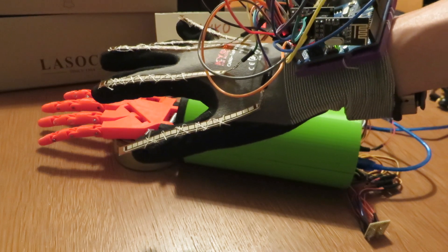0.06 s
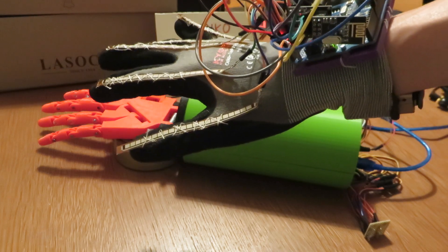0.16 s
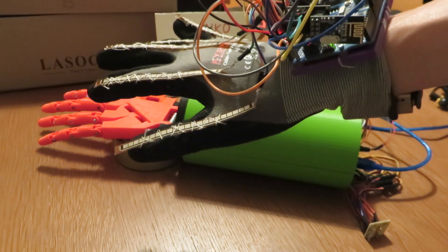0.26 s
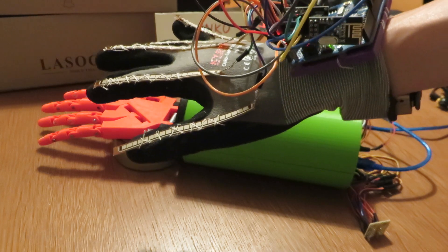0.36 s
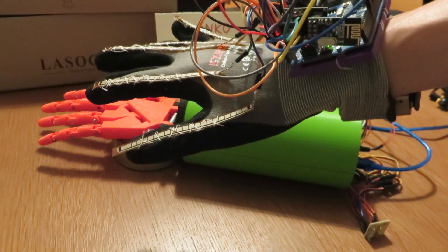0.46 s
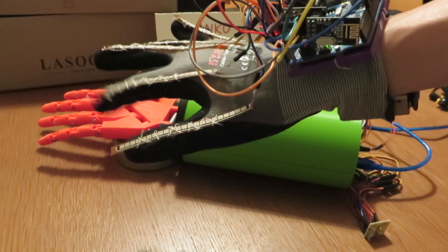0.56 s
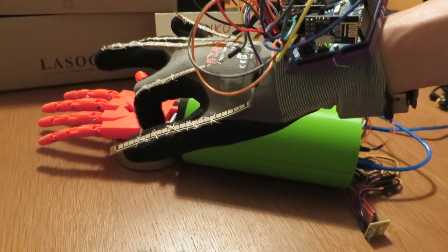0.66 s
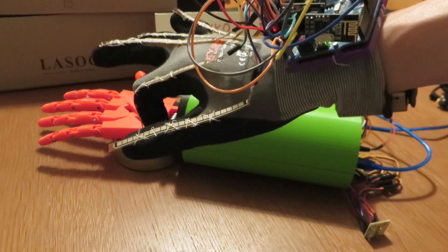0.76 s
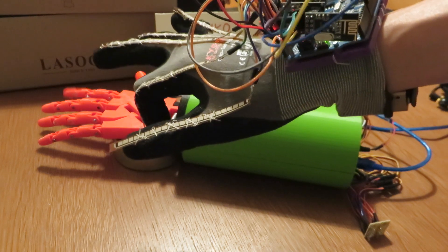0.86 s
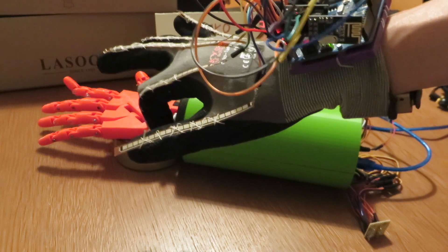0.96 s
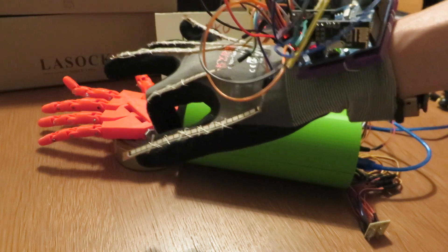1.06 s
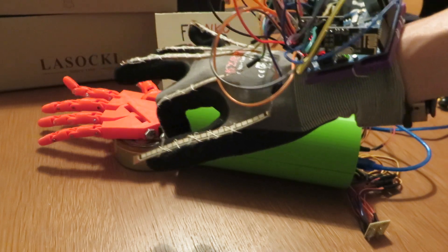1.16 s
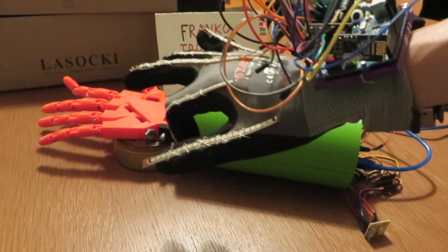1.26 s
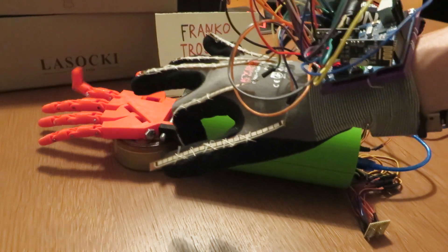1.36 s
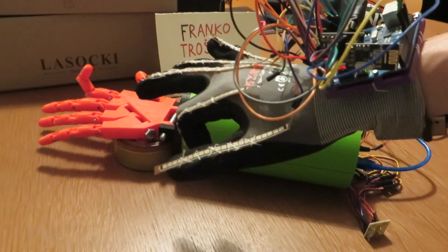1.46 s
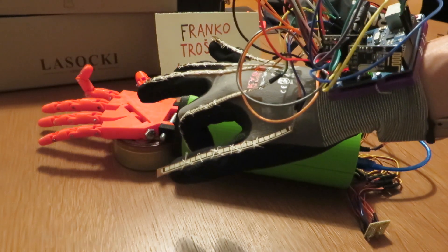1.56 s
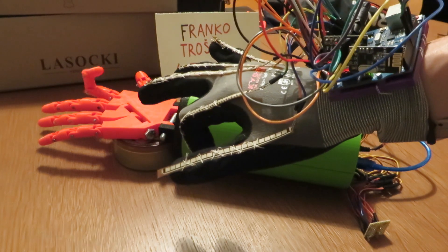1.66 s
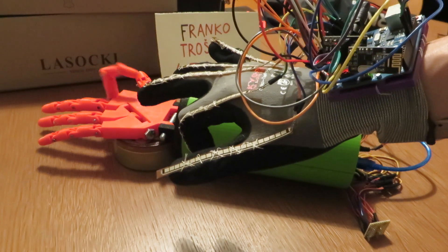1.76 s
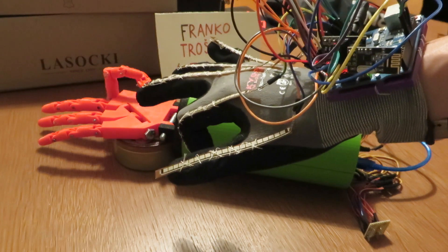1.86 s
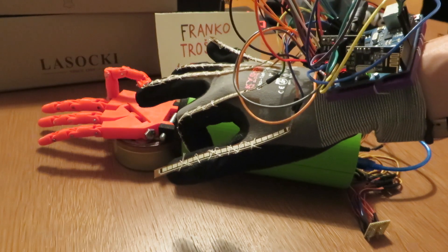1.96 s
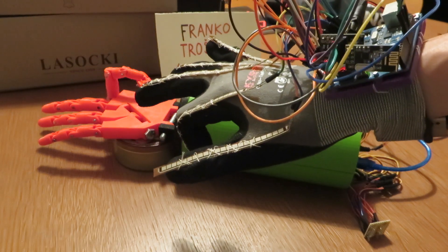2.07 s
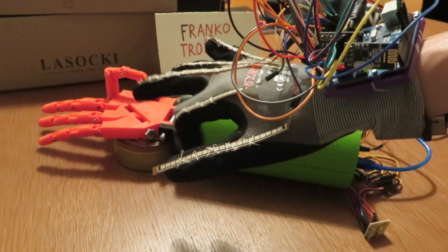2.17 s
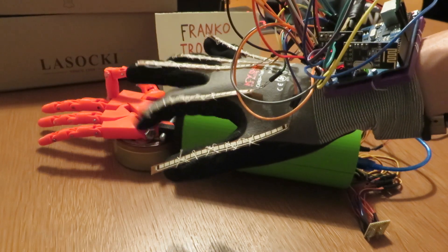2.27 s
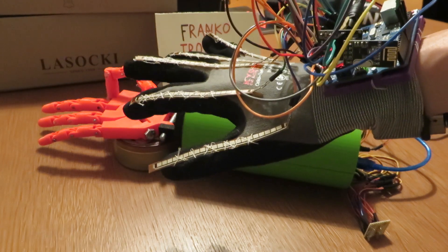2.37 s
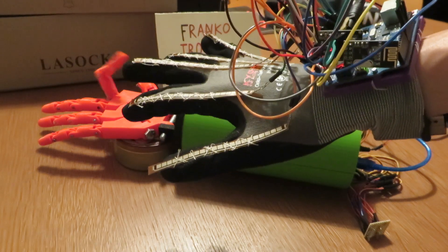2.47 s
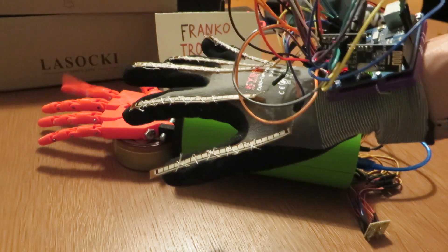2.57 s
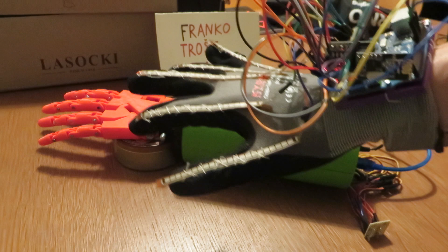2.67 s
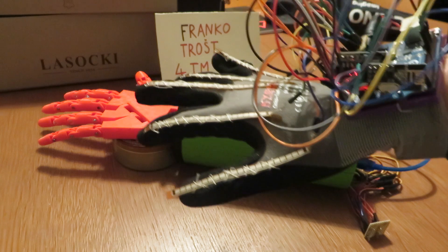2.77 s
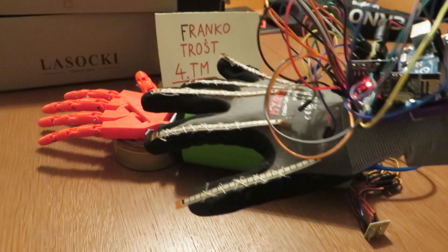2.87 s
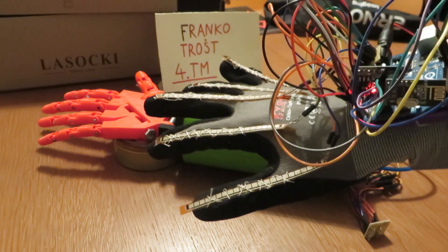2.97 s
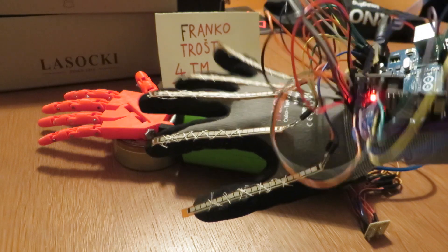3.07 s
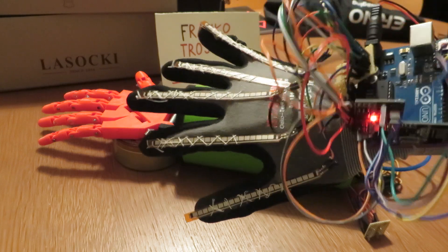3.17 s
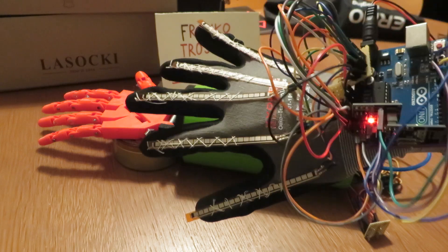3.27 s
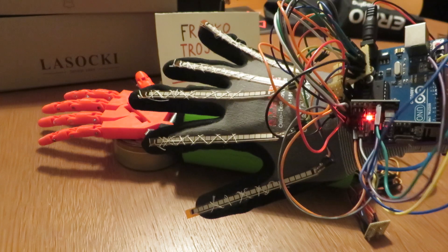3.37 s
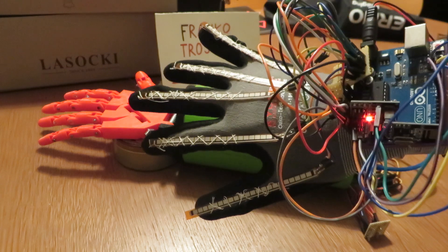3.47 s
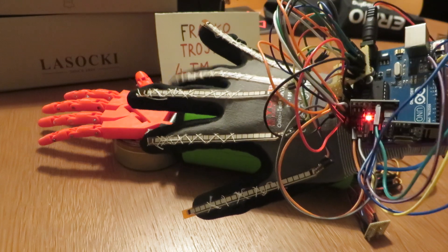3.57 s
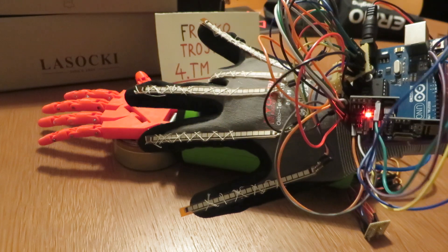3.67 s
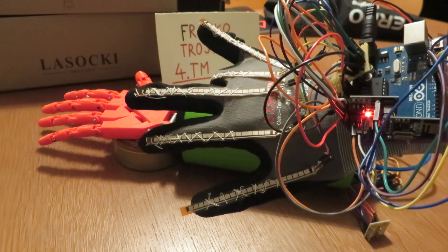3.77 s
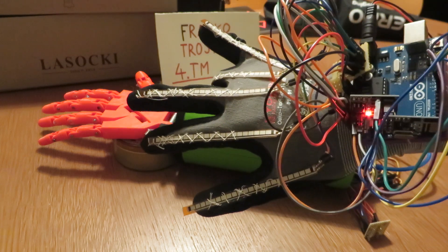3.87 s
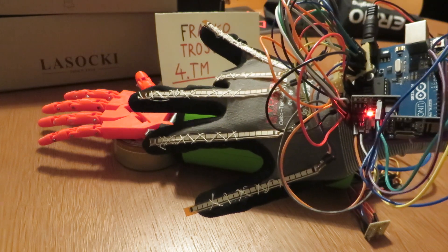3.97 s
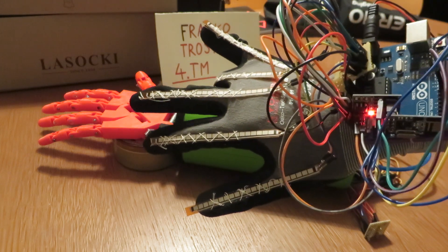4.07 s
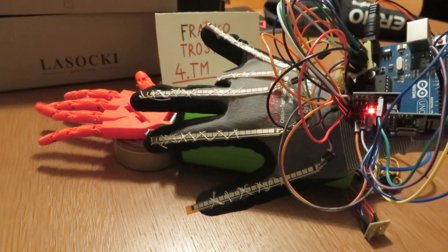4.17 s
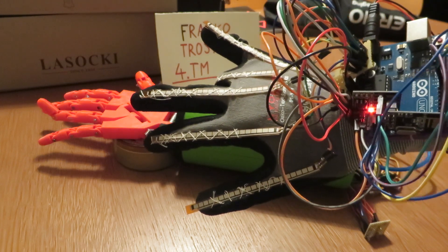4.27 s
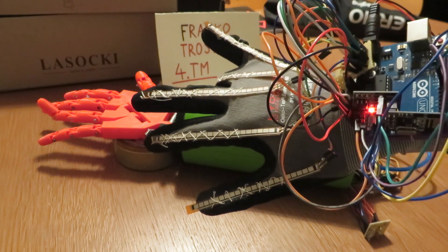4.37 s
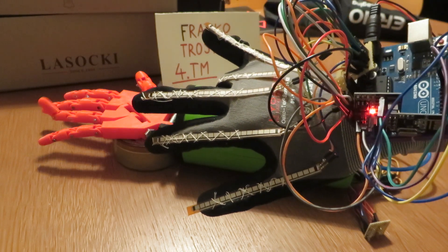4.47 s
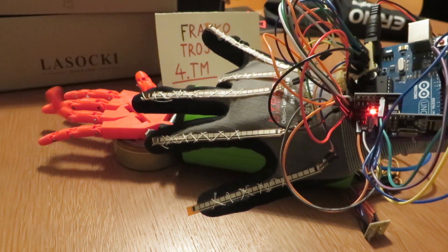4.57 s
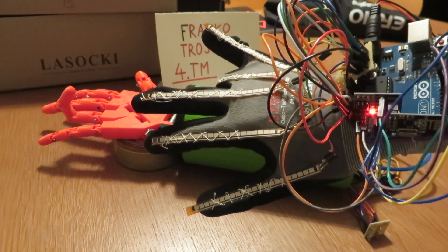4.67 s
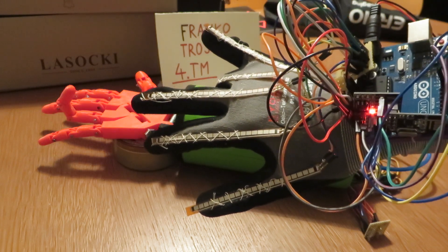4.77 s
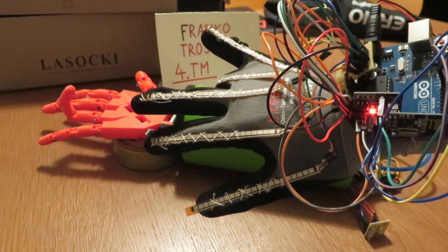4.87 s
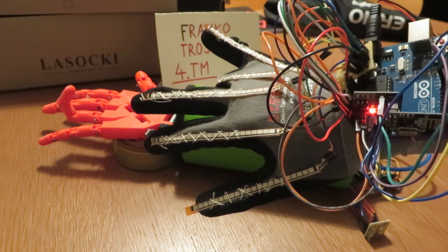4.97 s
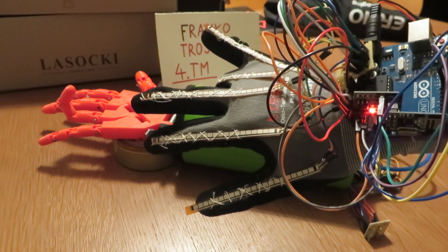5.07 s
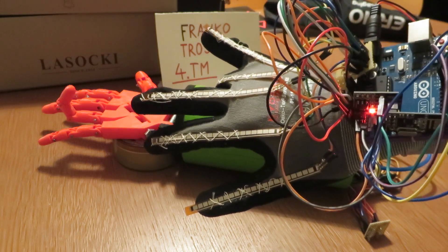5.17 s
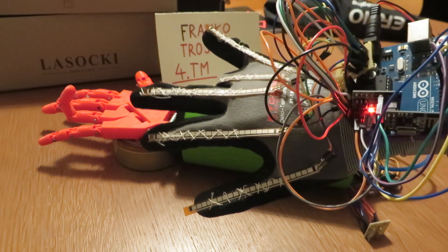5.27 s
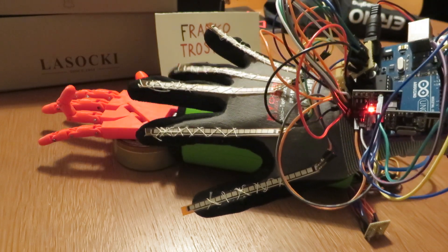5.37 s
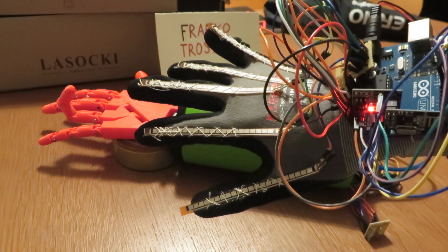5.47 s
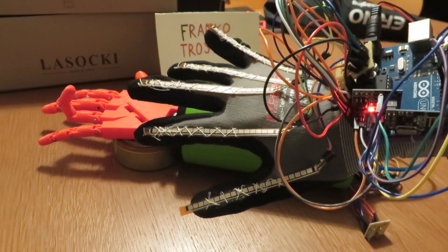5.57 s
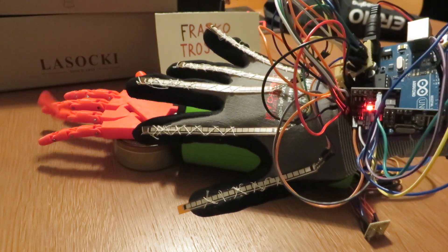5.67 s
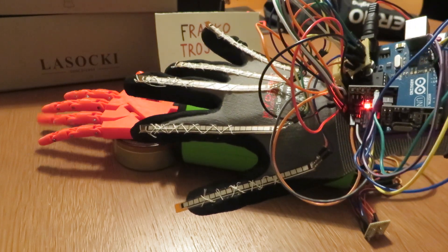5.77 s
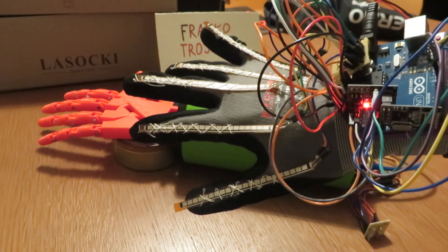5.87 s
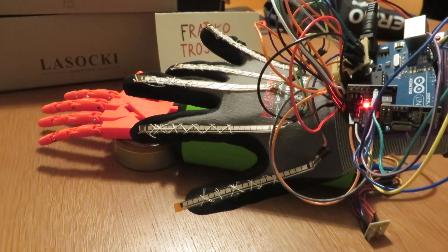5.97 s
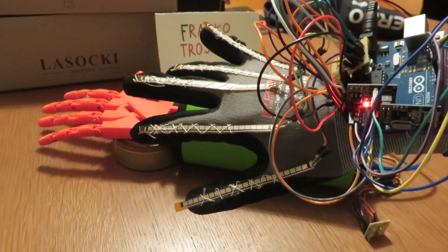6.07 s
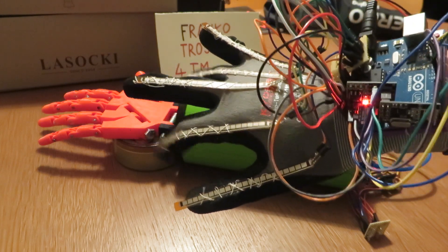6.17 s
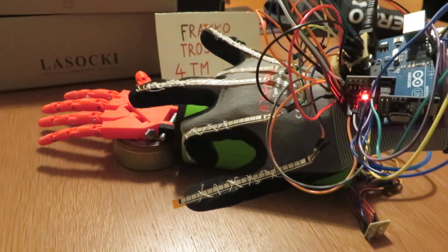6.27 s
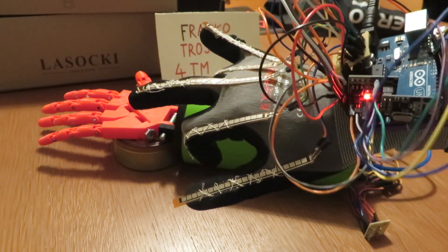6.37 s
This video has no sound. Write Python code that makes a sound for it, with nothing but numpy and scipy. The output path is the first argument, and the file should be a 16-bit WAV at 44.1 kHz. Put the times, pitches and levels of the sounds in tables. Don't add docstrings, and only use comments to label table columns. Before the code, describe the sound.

Faint servo ticking, then brief gear whines and grinding rattles as a plastic robot hand moves, thumping sharply once on a wooden table.

```python
import sys
import numpy as np
from scipy import signal
from scipy.fft import rfft, irfft, next_fast_len
from scipy.io import wavfile
from scipy.ndimage import uniform_filter1d

SR = 44100
rng = np.random.default_rng(int(sys.argv[2]) if len(sys.argv) > 2 else 0)


def attenuation_scalar(level_db):
    decades = np.asarray(level_db, float) / 20
    return 10 ** decades


def log_audio(samples):
    frames = np.atleast_2d(samples).T
    limited = np.clip(frames, -1, 1)
    pcm = np.round(limited * 32767).astype(np.int16)
    wavfile.write(sys.argv[1], SR, pcm)


N = 282663
T = np.arange(N) / SR
FRAME_HZ = 49.1


def evened(x):
    return x / np.sqrt(np.mean(x ** 2) + 1e-20)


def read(points, hz):
    f, value = np.transpose(points)
    return np.interp(np.log(hz + 1), np.log(f + 1), value)


def add(mix, s, sound):
    part = mix[round(s * SR):][:len(sound)]
    part += sound[:len(part)]


def colour(x, points):
    gain_db = read(points, abs(np.fft.fftfreq(4096, 1 / SR)))
    log_gain = np.log(attenuation_scalar(np.maximum(gain_db, -90)))
    taps = np.fft.ifft(np.exp(np.conj(signal.hilbert(log_gain)))).real[:2048]
    return signal.oaconvolve(x, taps / np.linalg.norm(taps))[:len(x)]


def resonate(x, hz, width):
    r = np.exp(-np.pi * width / SR)
    return 2 * signal.lfilter([1 - r], [1, -r * np.exp(2j * np.pi * hz / SR)], x).real


def highpass(x, order, hz):
    return signal.sosfilt(signal.butter(order, hz, "high", fs=SR, output="sos"), x)


def wander(size):
    steps = uniform_filter1d(rng.standard_normal(2 * N // size + 4), size=2)
    slow = np.interp(np.arange(N) * 2 / size, np.arange(len(steps)), steps)
    return np.clip(evened(slow), -3, 1.7)


def halves(x, hz=6000):
    low = signal.sosfiltfilt(signal.butter(3, hz, fs=SR, output="sos"), x)
    return low, x - low


def throb(depth_db, start):
    return attenuation_scalar(depth_db * np.cos(2 * np.pi * FRAME_HZ * (T - start)))


# frequency in Hz, level in dB per Hz.
HUM = [(15, -31.5), (25, -21.5), (107, -6.5), (148, -8.5), (188, -4), (359, -4), (495, -10.5), (582, -0.5),
       (703, -13.5), (1110, -9.5), (1450, -12.5), (7100, -24.5), (15500, -38)]
HUM_DB = -44.5
# centre in Hz, width in Hz, level in dB.
DRONES = [(103.8, 14, -59), (658, 225, -49.5), (1098, 25, -57.5), (4630, 980, -61)]
# frequency in Hz, likeness from -1 to 1.
SAME = [(60, 1), (130, -0.27), (290, -0.71), (640, -0.72), (1410, -0.11), (3100, 0.63), (6820, 0.6),
        (15000, -0.16)]
# frequency in Hz, left over right in dB.
HUM_LEAN = [(60, -3), (180, 2), (550, -4), (1650, -2), (4970, 1.5), (15000, -1.5)]


def hum():
    frames, hz = N // 512 + 6, np.fft.rfftfreq(2048, 1 / SR)
    a, b, c, d, patches = rng.standard_normal((frames, 1025, 5)).T
    patches = uniform_filter1d(patches, size=16, axis=0)
    patches = evened(uniform_filter1d(patches, size=6, axis=1))
    same = np.clip(read(SAME, hz), -1, 1)[:, None]
    left = a + 1j * b
    z = np.array([left, same * left + np.sqrt(1 - same ** 2) * (c + 1j * d)])
    lean_db = np.multiply.outer([.5, -.5], read(HUM_LEAN, hz))[..., None]
    z *= attenuation_scalar(lean_db + 0.68 * patches)
    wide_db = read(HUM, hz)
    wide = attenuation_scalar(HUM_DB + wide_db) ** 2 / np.sum(attenuation_scalar(wide_db) ** 2)
    peaks = sum(attenuation_scalar(db) ** 2 * np.exp(-.5 * ((hz - f) / w * 2) ** 2) * 17 / w for f, w, db in DRONES)
    z *= np.sqrt(wide + peaks)[:, None]
    return 1.336 * signal.istft(z, nperseg=2048, noverlap=1536)[1][:, :N]


# time in seconds, level in dB.
BUSY = [(0, -52.5), (.8, -61), (1.2, -52.5), (2.4, -56.5), (3.1, -56.5), (3.3, -71), (4.0, -61), (4.5, -57),
        (5.3, -70), (6.4, -69)]
# frequency in Hz, level in dB per Hz.
GEARS = [(710, -63.5), (1200, 6.5), (1980, -4.5), (2280, 5), (3350, 1.5), (4570, -2.5), (5980, 3.5),
         (7410, 0.5), (9990, -6.5), (12100, -10), (14700, -26), (15500, -41.5)]


def holding():
    beats = np.diff(np.floor((T - .015) * FRAME_HZ), prepend=0) > 0
    size = beats * attenuation_scalar(2.5 * np.clip(rng.standard_normal(N), -3, 1.0))
    puff = signal.oaconvolve(size, np.exp(-T[:400] / 0.0039))[:N] * rng.standard_normal(N)
    busy_db = np.interp(T, *np.transpose(BUSY))
    return attenuation_scalar(busy_db) * evened(resonate(puff, 4760, 816) + 0.21 * colour(puff, GEARS))


# start in seconds, tick peak in dB, spin over the tick in dB,
# spin rise in seconds, brightness in dB.
SPINS = [(.0014, -25, -2.5, 0.0056, -6.5), (0.1402, -15, -2.5, 0.0084, -4), (0.261, -23, 5.5, 0.0059, -4),
         (0.6017, -27, 5, 0.005, -5), (0.802, -29.5, 6.5, 0.0056, -5), (3.111, -29.5, 3, 0.0064, -10.5),
         (3.173, -22, -9, 0.0097, -7), (3.5354, -34, 1, 0.0043, -7.5), (3.899, -27, -9, 0.0032, -4)]
# start in seconds, tick peak in dB, spin over the tick in dB,
# brightness in dB.
TICKS = [(0.0338, -35, -22, 4), (0.0806, -15.5, -17, -3), (0.924, -21, -15, 1), (1.9143, -17.5, -13, -38),
         (2.048, -20, -16, -15), (2.067, -25, -8, -18), (2.208, -15.5, -21, -11.5),
         (2.4728, -14.5, -10, -9.5), (3.015, -23, -2, -5), (3.236, -37, -39, 0), (3.274, -20.5, -17, -35),
         (3.3535, -25.5, -15, -19), (3.494, -28, -12, -33), (3.5956, -20.5, -20, -11.5),
         (3.6361, -27, -11, -11), (3.6964, -39, -9, -13), (3.756, -19, -16, -10.5), (3.7964, -30, -9, -7),
         (3.8152, -23, -16, -16), (3.8564, -34, -6, -14), (4.058, -16.5, -15, -12), (4.0795, -23, -9, -12),
         (4.1015, -14, -16, -8.5), (4.559, -17, -19, -9), (5.0, -35, -9, -10), (5.1821, -34, -10, -19),
         (5.2638, -22.5, -11, -2), (5.6887, -19.5, -13, -10)]
SPIN_FALL_S, TICK_RISE_S, TICK_FALL_S = 0.019, 0.0028, 0.0098


def kicks():
    low, high = np.zeros((2, N))
    t = T[:6000]
    rows = [row + (SPIN_FALL_S,) for row in SPINS]
    rows += [(s, db, spin, TICK_RISE_S, bright, TICK_FALL_S) for s, db, spin, bright in TICKS]
    for s, db, spin_db, rise, bright_db, fall in rows:
        spin = attenuation_scalar(spin_db) * np.where(t < rise, (t / rise) ** 2, np.exp(-(t - rise) / fall))
        tick = np.minimum(t / .0006, 1) * np.exp(-t / .0019)
        shape = attenuation_scalar(db - 6) * (tick + spin)
        add(low, s, shape)
        add(high, s, shape * attenuation_scalar(bright_db))
    return low, high


# frequency in Hz, width in Hz, level in dB.
CASE = [(2220, 57, -25), (3640, 84, -8.5), (4090, 160, -0.5), (4660, 270, 3), (5130, 88, -11.5),
        (5750, 92, -23), (6600, 260, -16.5), (7300, 450, -3), (7670, 91, -4.5), (8230, 120, -0.5),
        (8850, 160, -3), (9300, 68, -16), (10380, 85, -9), (12200, 99, -3)]


def case(x, low_db, high_db, patchy_db):
    ring = 0
    for hz, width, db in CASE:
        mode_db = db + (low_db if hz < 6000 else high_db) + patchy_db * wander(size=500)
        ring = ring + attenuation_scalar(mode_db) * resonate(x, hz, width)
    return colour(x + ring, GEARS)


def teeth(per_s=12000, spread_db=1.7, flutter_db=.6):
    size = attenuation_scalar(spread_db * np.minimum(rng.exponential(1, N), 3.5)) * rng.choice([-1, 1], N)
    return evened(size * (rng.random(N) < per_s / SR)) * attenuation_scalar(flutter_db * wander(size=120))


# start in seconds, held time in seconds, rise in seconds, level in dB, brightness in dB.
RUNS = [(.085, 0.016, 0.004, -25, 0.5), (.922, 0.099, 0.017, -22, -6.5), (1.385, 0.093, 0.012, -22, -7.5),
        (1.668, 0.12, 0.011, -25, -3), (2.472, 0.19, 0.014, -27, 4), (2.686, 0.029, 0.0053, -26, 0),
        (4.074, 0.24, 0.014, -34, -2.5), (4.557, 0.12, 0.019, -31, -8), (5.686, 0.24, 0.021, -30.5, -5.5)]
# low grind in dB, coasting in seconds.
LOADS = [(-23, 0.027), (-14, 0.045), (-15.5, 0.044), (-13.5, 0.036), (-5.5, 0.0073), (-7.5, 0.058),
         (-12.5, 0.031), (-18, 0.082), (-11, 0.055)]
DULLING, SWELL = 3.6, 1.3


def runs():
    low, high, grind = np.zeros((3, N))
    for (s, length, rise, db, bright_db), (grind_db, coast) in zip(RUNS, LOADS):
        t = np.maximum(T - s, 0)
        up = (1 - np.exp(-t / rise)) ** SWELL
        down = np.exp(-np.maximum(t - length, 0) / coast)
        low += attenuation_scalar(db) * up * down
        high += attenuation_scalar(db + bright_db) * up * down ** DULLING
        grind += attenuation_scalar(db + grind_db) * up ** 4 * down
    return low, high, grind


# time in seconds, mesh frequency in Hz, level in dB.
SPEEDS = [
    [(.934, 3300, -46), (.946, 3620, -36), (.955, 4200, -30), (.966, 4450, -34), (.979, 5100, -30),
     (1.0, 5480, -36), (1.012, 4650, -35), (1.019, 4120, -29), (1.031, 3450, -36)],
    [(1.403, 3400, -48), (1.415, 3670, -34), (1.422, 4400, -26), (1.433, 4680, -26), (1.445, 5100, -32),
     (1.461, 5250, -30), (1.473, 4600, -27), (1.479, 4050, -31), (1.488, 3600, -42)],
    [(1.69, 3950, -40), (1.703, 4250, -32), (1.715, 4500, -27), (1.725, 4780, -22), (1.734, 4720, -27),
     (1.744, 4450, -29), (1.776, 4760, -31), (1.784, 3560, -35), (1.796, 2800, -38)],
    [(2.488, 3400, -44), (2.505, 4100, -31), (2.518, 4600, -30), (2.556, 4620, -28), (2.575, 4640, -32),
     (2.59, 4560, -27), (2.62, 4680, -31), (2.652, 4640, -27), (2.664, 4500, -32)],
    [(4.108, 3716, -47), (4.126, 3950, -40), (4.134, 4380, -34), (4.164, 4550, -26.5), (4.2, 4650, -32),
     (4.232, 4800, -31), (4.264, 4580, -28), (4.299, 4380, -31), (4.307, 3850, -44)],
    [(4.575, 2620, -54), (4.588, 2950, -48), (4.6, 3540, -45), (4.619, 4050, -46), (4.64, 3850, -52),
     (4.657, 3750, -47), (4.669, 4600, -42), (4.684, 4200, -45), (4.695, 3800, -54)],
    [(5.7, 3300, -52), (5.725, 4300, -45), (5.75, 4650, -41), (5.8, 4680, -39), (5.85, 4700, -39),
     (5.9, 4550, -41), (5.93, 4300, -44)],
]
# speed jitter as a share, flutter in dB, overtones in dB.
WOBBLE = [(.036, 2., 5), (.036, 2., 4), (.028, 1.5, 3), (.032, 3., 1), (.018, 1.5, -9), (.045, 3.5, -2),
          (.045, 3.5, -6)]
# multiple of the mesh frequency, level in dB.
MESH = [(.5, -31), (1, -2), (1.5, -22), (2, -20), (2.5, -27)]
# frequency in Hz, width in Hz, lift in dB.
LIFTS = [(2270, 180, 15), (4500, 350, 3), (7250, 450, 16)]
RIPPLE, RIPPLE_START_S = 0.017, 0.01096


def mesh():
    s, hz, db = np.transpose(sum(SPEEDS, []))
    starts = [run[0][0] for run in SPEEDS]
    ends = np.array([run[-1][0] for run in SPEEDS])
    which = np.maximum(np.searchsorted(starts, T) - 1, 0)
    jitter, flutter_db, over_db = np.transpose(WOBBLE)[:, which]
    driven = uniform_filter1d(1. * (T < ends[which]) * (T > s[0]), size=200)
    hz = np.interp(T, s, hz) * (1 + RIPPLE * np.cos(2 * np.pi * FRAME_HZ * (T - RIPPLE_START_S)))
    turns = np.cumsum(hz * (1 + jitter * wander(size=60))) / SR
    stack = np.zeros(N)
    for k, k_db in MESH:
        lift_db = sum(lift / (1 + ((k * hz - f) / w) ** 2) for f, w, lift in LIFTS)
        overtone_db = (k != 1) * min(k, 1) * over_db
        shake_db = (2 if k % 1 else 1) * flutter_db * wander(size=130)
        stack += attenuation_scalar(k_db + overtone_db + lift_db + shake_db) * np.sin(2 * np.pi * k * turns)
    return np.sqrt(2) * stack * driven * attenuation_scalar(np.interp(T, s, db)) * throb(3.5, 0.013)


# low modes in dB, high modes in dB.
RINGS = [(1, -14.5), (0.5, 6), (0.5, 4), (1.5, 2.5), (0, -0.5), (2.5, 4), (-3.5, -17), (-3, -3),
         (-0.5, -12)]


def servos():
    which = np.maximum(np.searchsorted([row[0] for row in RUNS], T) - 1, 0)
    low_db, high_db = np.transpose(RINGS)[:, which]
    low, high = halves(case(teeth(), low_db + 6.0, high_db + 3.5, patchy_db=7.0))
    grind, low = halves(low, hz=3700)
    low_gain, high_gain, grind_gain = runs()
    rattle = attenuation_scalar(-8.5) * evened(low) * low_gain + attenuation_scalar(-0.5) * evened(high) * high_gain
    rattle += evened(grind) * grind_gain * attenuation_scalar(0.5 + 1.55 * wander(size=300))
    low, high = halves(case(rng.standard_normal(N), -8.5, 0.62, patchy_db=-7.0))
    low = highpass(low, 6, 3600)
    low_kick, high_kick = kicks()
    kick = attenuation_scalar(-6.0) * evened(low) * low_kick + attenuation_scalar(-1.5) * evened(high) * high_kick
    return rattle * throb(1.0, 0.0023) + kick + mesh()


# start in seconds, rise in seconds, length in seconds,
# rumble in dB, depth in dB.
DRAGS = [(0.933, 0.052, 0.12, -31, -7.5), (1.395, 0.038, 0.12, -32, -11), (1.67, 0.057, 0.062, -24.5, -12),
         (1.807, 0.023, 0.12, -33, -4.5), (1.955, .008, 0.016, -57, -9), (2.477, 0.042, 0.32, -29, -18),
         (2.65, 0.01, 0.052, -20.5, -0.5), (4.103, 0.073, 0.13, -40.5, -18), (4.184, 0.089, 0.11, -30, -9),
         (4.556, 0.049, 0.21, -36, -9), (4.691, 0.022, 0.12, -33, -24), (5.701, 0.055, 0.18, -32, -28),
         (5.774, 0.029, 0.14, -29, -3)]
# frequency in Hz, level in dB per Hz.
ARM = [(53, 4.5), (90, -12.5), (124, -23.5), (219, -6.5), (306, -2.5), (416, -0.5), (498, -13), (564, -2),
       (944, 3.5), (2500, -16), (3250, -45), (5500, -120)]
# frequency in Hz, level in dB, t60 in seconds.
SHELL = [(142.7, -7, 0.84), (194, -6, 0.45), (320, -4, 0.18), (483, 1, 0.37), (792, 5, 0.097),
         (1090, 9.5, 0.023), (1550, 7.5, 0.024)]
DRAG_SAG_DB_PER_S, DRAG_FALL_S = 18, 0.033


def arm():
    lumps = rng.standard_normal(N) * attenuation_scalar(5 * wander(size=200))
    deep = sum(attenuation_scalar(db) * evened(resonate(lumps, f, 25 + 13.0 / t60)) for f, db, t60 in SHELL[:4])
    tube_gain, deep_gain = np.zeros((2, N))
    for s, rise, length, db, depth_db in DRAGS:
        t = np.maximum(T - s, 0)
        pull = np.minimum(t / rise, 1) ** 2 * attenuation_scalar(db - DRAG_SAG_DB_PER_S * np.maximum(t - rise, 0))
        pull *= np.exp(-np.maximum(t - length, 0) / DRAG_FALL_S)
        tube_gain += pull
        deep_gain += pull * attenuation_scalar(depth_db)
    return attenuation_scalar(-7.0) * (evened(colour(lumps, ARM)) * tube_gain + evened(deep) * deep_gain)


# time in seconds, peak in dB, ring in Hz, share of the table and tube modes
# in dB.
THUMPS = [(0.983, -24, 1040, -18), (1.448, -16, 820, -14), (1.495, -20, 846, 1.5), (1.691, -23.5, 1263, -6),
          (1.73, -17, 960, 3.5), (1.823, -22.5, 354, -22), (1.875, -26, 357, -18),
          (1.914, -30.5, 757, 15.5), (1.936, -25, 362, -15), (1.971, -34, 610, -8), (2.529, -24, 800, -5),
          (2.66, -1.5, 918, -20), (2.667, -11.5, 500, -5), (2.682, -7, 803, -10), (2.689, -11, 606, 10),
          (4.268, -18.5, 820, -3), (4.585, -32, 1500, -12), (4.598, -26, 777, -2), (4.709, -26, 1055, -10),
          (4.664, -27.5, 1550, 5.5), (4.717, -18, 815, 1.5), (4.738, -29, 1000, -7),
          (4.757, -26.5, 352, -1), (4.778, -24, 1475, -2), (4.797, -32, 1500, -4), (4.818, -43, 915, -4),
          (5.723, -27, 640, -1), (5.742, -37, 680, -9), (5.773, -26, 860, -4), (5.795, -18, 920, -10),
          (5.805, -12.5, 798, -17), (5.844, -23, 307, 11.5), (5.894, -27, 790, -15), (5.934, -23, 252.5, 6)]
RING_S, DAMPING = 0.063, 0.17


def thumps():
    out, t = np.zeros(N), T[:20000]
    detune = rng.uniform(1.0, 1.04, (len(THUMPS), len(SHELL)))
    for (s, db, hz, shell_db), shift in zip(THUMPS, detune):
        ring = sum(attenuation_scalar(d - 60 * t / t60) * np.sin(2 * np.pi * f * k * t)
                   for (f, d, t60), k in zip(SHELL, shift))
        part_t60 = RING_S * attenuation_scalar(-DAMPING * (db + 16.5))
        part = np.minimum(t / 0.0027, 1) * attenuation_scalar(-60 * t / part_t60) * np.sin(2 * np.pi * hz * t)
        add(out, s, attenuation_scalar(db - 7.5) * (part + attenuation_scalar(shell_db) * ring / abs(ring).max()))
    return out


# time in seconds, peak in dB, brightness in dB.
CRACKS = [(1.47, -10, -16), (1.731, -11, -17), (2.6607, -6.5, -5), (2.6625, -11, -5), (2.6652, 3.5, 1),
          (2.6901, 3.5, -17), (2.6955, -9, 5), (2.6984, -12, -2), (2.7048, -17, 2), (4.2601, -18, 1),
          (4.586, -29, -4), (4.666, -25, -5), (4.7188, -14.5, -8), (4.7274, -24, 2), (4.755, -11, -13.5),
          (4.758, -12.5, -16), (5.797, -21, 0), (5.8085, -14.5, 2), (5.889, -17, -2.5)]
CRACK_HZ, CRACK_WIDTH_HZ, CRACK_RING_DB = 2900, 600, -2


def cracks():
    out, t = np.zeros(N), T[:600]
    grit = rng.standard_normal((len(CRACKS), 600))
    shape = np.minimum(t / .001, 1) * np.exp(-(t / .0024) ** 2)
    band = signal.butter(2, [2000, 11000], "band", fs=SR, output="sos")
    for (s, db, bright_db), noise in zip(CRACKS, grit):
        low, high = halves(signal.sosfilt(band, noise))
        low = evened(low) + attenuation_scalar(CRACK_RING_DB) * evened(resonate(noise, CRACK_HZ, CRACK_WIDTH_HZ))
        add(out, s, attenuation_scalar(db - 8.5) * shape * (attenuation_scalar(-4.5) * evened(low) + attenuation_scalar(bright_db) * evened(high)))
    return out


# time in seconds, level in dB, frequency in Hz, t60 in seconds.
BOOM = (2.672, -32, 136, .6)


def boom():
    s, db, hz, t60 = BOOM
    t = np.maximum(T - s, 0)
    return np.minimum(t / 0.016, 1) * attenuation_scalar(db - 60 * t / t60) * np.sin(2 * np.pi * hz * t)


# frequency in Hz, left over right in dB.
LEAN = [(200, 1), (400, -0.5), (650, 3.5), (1000, 8), (2000, 11), (3200, 3), (10000, 5), (12500, 10)]
# frequency in Hz, lead of the left in radians.
LEAD = [(60, .2), (300, .6), (900, 1.2), (1500, 1.3), (2200, -1.1), (3000, -.55), (4800, -.65),
        (7000, -.15), (12000, -.1)]


def ports(x):
    size = next_fast_len(len(x) + 4096)
    hz = np.fft.rfftfreq(size, 1 / SR)
    half = attenuation_scalar(read(LEAN, hz) / 2) * np.exp(.5j * read(LEAD, hz))
    return irfft(rfft(x, size) * np.array([half, 1 / half]), size)[:, :len(x)]


# frequency in Hz, t60 in seconds.
ROOM = [(150, .45), (500, .4), (1500, .42), (4500, .34), (8000, .34), (13000, .27)]


def room(x, shared_db=-10, diffuse_db=-6):
    taps = np.zeros((3, SR // 2 + SR // 4))
    at = np.arange(150, taps.shape[1] - 20, 20)
    at = at + rng.integers(0, 20, (3, len(at)))
    np.put_along_axis(taps, at, rng.choice([-1., 1.], at.shape), 1)
    hz, t, z = signal.stft(taps, SR, nperseg=256)
    tail = signal.istft(z * attenuation_scalar(-60 * t / read(ROOM, hz)[:, None]), SR, nperseg=256)[1]
    wet = signal.fftconvolve(x[None], tail / np.linalg.norm(tail[0]), axes=1)[:, :N]
    return ports(x + attenuation_scalar(shared_db) * wet[0]) + attenuation_scalar(diffuse_db) * wet[1:]


def scene():
    hand = servos() + holding() + arm() + cracks() + thumps() + boom()
    hand = highpass(hand, 3, 105)
    return room(hand) + hum()


def top_cut(x):
    return signal.sosfilt(signal.butter(12, 15910, fs=SR, output="sos"), x)


# frequency in Hz, level in dB.
WHISTLE = (15734, -82)


def record(dry):
    heard = signal.sosfilt(signal.butter(5, 12600, fs=SR, output="sos"), dry)
    power_db = 10 * np.log10(abs(uniform_filter1d((heard ** 2).mean(0), size=200)) + 1e-12)
    fall = T * 16.2
    over_db = np.maximum(np.maximum.accumulate(power_db + fall) - fall + 20.0, 0)
    ducked = heard / attenuation_scalar(0.6 * uniform_filter1d(over_db, size=1500, origin=740))
    hz, db = WHISTLE
    ducked = ducked + attenuation_scalar(db) * np.sin(2 * np.pi * hz * T)
    edge = signal.ellip(8, .1, 60, 15820, fs=SR, output="sos")
    mix = signal.sosfilt(edge, np.clip(ducked, -.85, .85))
    return top_cut(mix)


dry = scene()
out = record(dry)
log_audio(out)
```